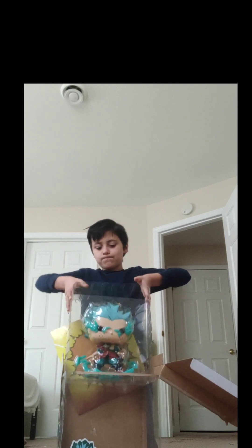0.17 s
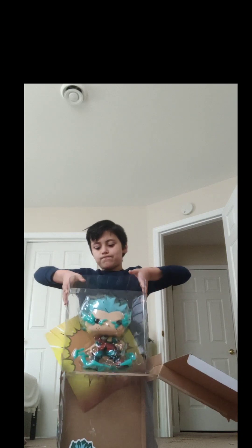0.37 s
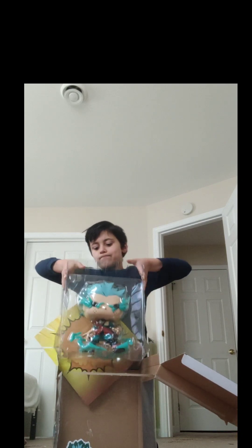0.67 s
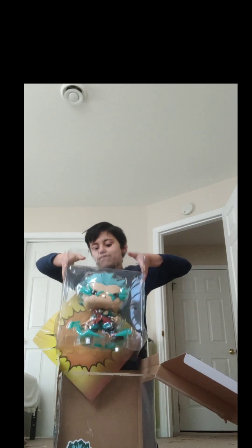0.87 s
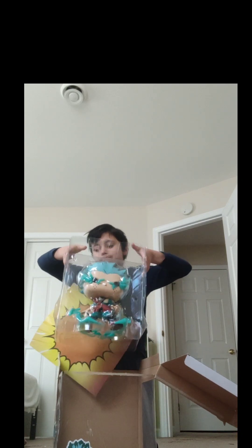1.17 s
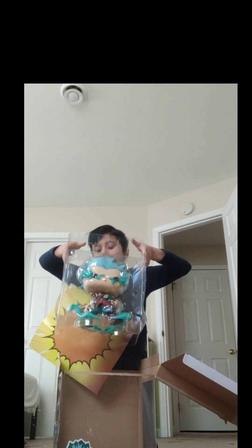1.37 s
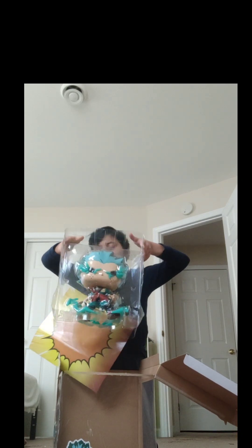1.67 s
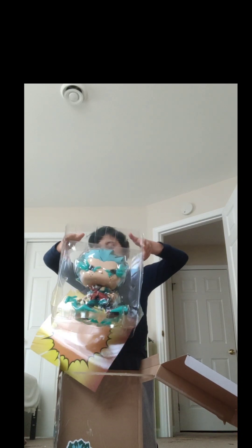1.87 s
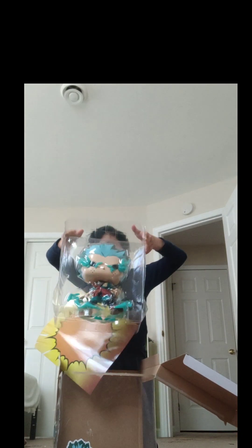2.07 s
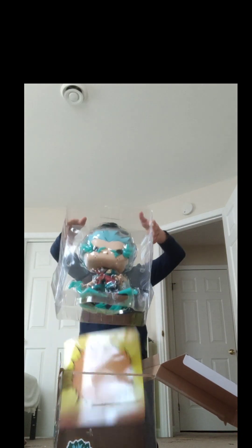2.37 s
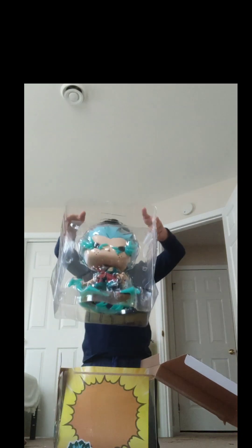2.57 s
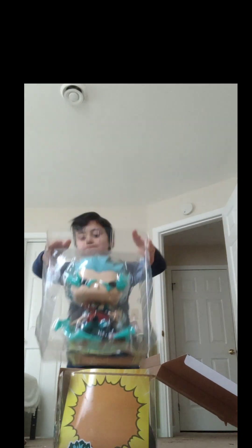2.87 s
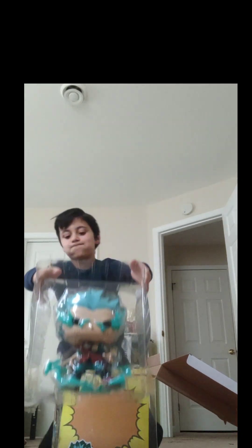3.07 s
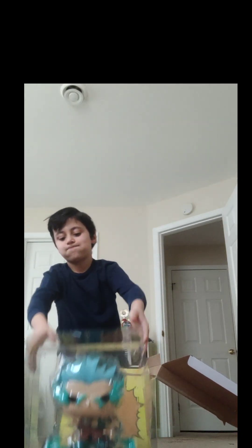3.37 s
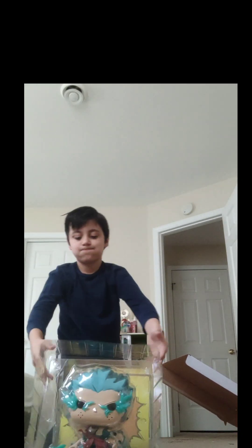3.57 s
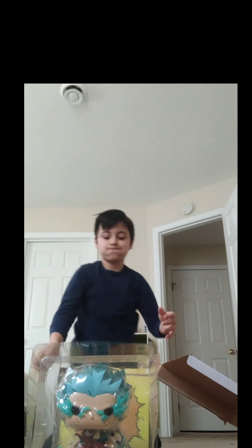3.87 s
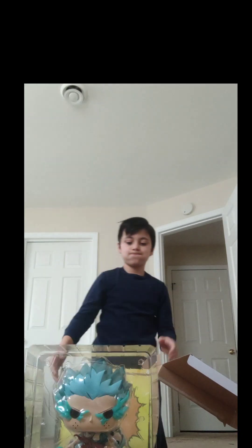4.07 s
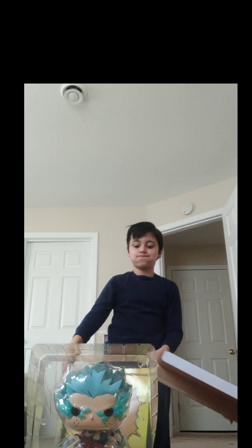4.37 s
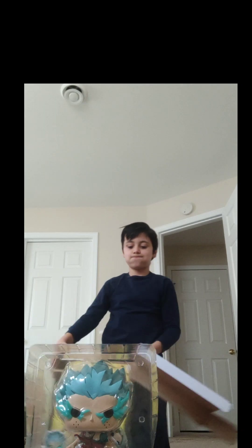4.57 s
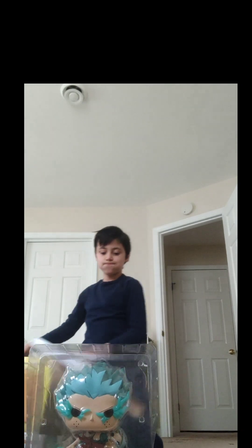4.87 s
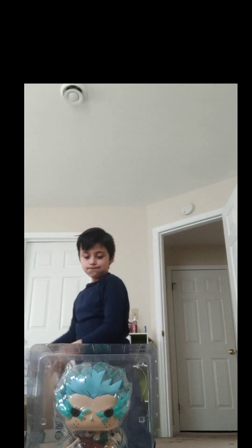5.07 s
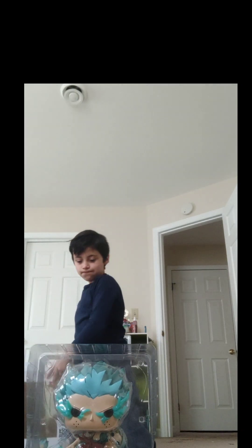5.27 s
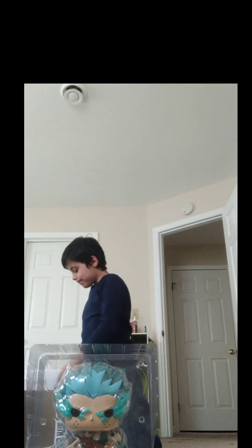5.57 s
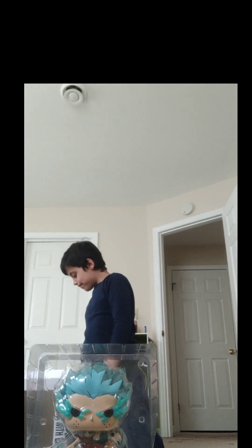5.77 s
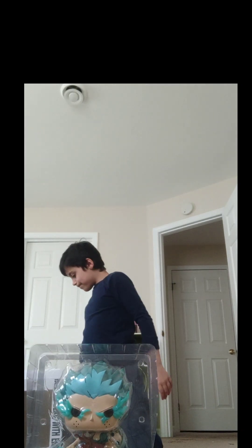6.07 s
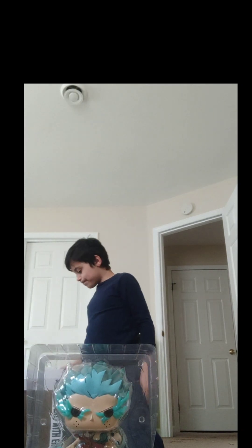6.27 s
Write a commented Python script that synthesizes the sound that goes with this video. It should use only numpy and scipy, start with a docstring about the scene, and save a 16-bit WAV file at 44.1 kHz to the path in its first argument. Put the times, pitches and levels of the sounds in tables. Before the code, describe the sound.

Toy packaging handled very near a stereo phone microphone indoors: dull cardboard rubs, thin plastic hiss and ticks, with quiet gaps. Midway a card insert knocks into the box, followed by a deep panel pop and the loudest moment, a thudding, crackling set-down. Afterwards the box is dragged about, with one more hollow pop, low puffs of air and fading scrapes.

```python
"""Toy tray out of a cardboard box

A big toy in a clear plastic tray is drawn out of a cardboard box in a small room, close to a phone.
The tray rubs in short strokes, sticks and snaps; a card insert slides out and drops back into the box;
the tray is set down with a clatter. Throughout, the box is shoved about: its cardboard scrapes and its
panels pop. Rubs, snaps and landings are shaped noise, card taps are decaying modes, panel pops are
swings of pressure."""
import sys
import numpy as np
from scipy import signal
from scipy.fft import rfft, irfft, next_fast_len
from scipy.io import wavfile

SR = 44100
rng = np.random.default_rng(int(sys.argv[2]) if len(sys.argv) > 2 else 0)


def dump_mix(stems):
    """Bounce the given channels to the path in sys.argv[1] as a 16-bit WAV at rate SR."""
    frames = np.atleast_2d(stems).T  # one column per channel
    limited = np.clip(frames, -1, 1)  # hard clip at full scale
    pcm = np.round(limited * 32767).astype(np.int16)
    wavfile.write(sys.argv[1], SR, pcm)


N = 282228
TIME = np.arange(N) / SR


def amp(db):
    """Decibels to gain."""
    return 10 ** (np.asarray(db) / 20)


def unit(x):
    """Scale to rms 1."""
    return x / np.sqrt(np.mean(x ** 2) + 1e-20)


def along(points, hz):
    """Read a curve of (Hz, value) points on a log frequency axis."""
    f, value = np.transpose(points)
    return np.interp(np.log(hz + 1), np.log(f), value)


def dull(hz, edge_hz, order):
    """Gain of a soft contact, which leaves out what lies above its edge."""
    return 1 / np.hypot(1, (hz / edge_hz) ** order)


def filtered(x, response):
    """Multiply the spectrum of x by a response of frequency."""
    n = x.shape[-1]
    size = next_fast_len(n + 4096)
    gain = response(np.fft.rfftfreq(size, 1 / SR))
    return irfft(rfft(x, size) * gain, size)[..., :n]


def coloured(x, spectrum, ripple_db=0, spacing_hz=110):
    """Give x a spectrum, at rms 1; the crowded modes of a sheet ripple it at random."""
    modes = rng.standard_normal(SR // 40)

    def gain(hz):
        ripple = ripple_db * np.interp(hz / spacing_hz, np.arange(len(modes)), modes)
        return amp(along(spectrum, hz) + ripple)

    return unit(filtered(x, gain))


def add(out, s, x):
    """Mix x into out from time s."""
    i = max(round(s * SR), 0)
    out[:, i:i + x.shape[-1]] += x[..., :max(N - i, 0)]


# How alike a noise is at the two ports. Each row: frequency in Hz, correlation from 0 to 1.
PORT_LIKENESS = [(130, .99), (300, .98), (430, .93), (680, .5), (1400, .15), (3000, 0)]


def half_turn(hz):
    """Angle in radians by which each port leans away from the common sound."""
    return np.arccos(np.clip(along(PORT_LIKENESS, hz), -1, 1)) / 2


def pair(n):
    """White noise at the two ports: alike in the bass, unrelated in the treble."""
    def share(hz):
        return np.array([np.cos(half_turn(hz)), np.sin(half_turn(hz))])

    mid, side = filtered(rng.standard_normal((2, n)), share)
    return np.array([mid + side, mid - side])


# How long the small room rings. Each row: frequency in Hz, 60 dB decay time in seconds.
ROOM_DECAY = [(100, 0.94), (260, 0.17), (700, 0.36), (2000, 0.19), (5000, 0.24), (13000, 0.33)]


def echo(x, gap=0.00089):
    """The room's answer: decaying noise, drawn anew each time, that swells in over about gap seconds."""
    hz, t, z = signal.stft(pair(SR // 2), SR, nperseg=256)
    decay = amp(-60 * t / along(ROOM_DECAY, hz)[:, None])
    tail = signal.istft(z * decay, SR, nperseg=256)[1]
    tail_s = np.arange(tail.shape[1]) / SR
    tail = tail * (1 - np.exp(-(tail_s / gap) ** 2))
    return signal.fftconvolve(np.atleast_2d(x), tail / np.linalg.norm(tail[0]), axes=1)


def in_room(x, wet_db):
    """A moving source: a new echo every quarter second, total power roughly unchanged."""
    out, step = x.copy(), SR // 4
    for i in range(0, N, step):
        add(out, i / SR, amp(wet_db) * echo(x[:, i:i + step]))
    return out / np.hypot(1, amp(wet_db))


def slips(rate, spread_db, life):
    """Envelope of rms 1: tiny stick-slip releases (rate per second, life in s), a few much larger."""
    happens = rng.random(N) < rate / SR
    size = amp(spread_db * np.minimum(rng.standard_exponential(N), 3.5))
    power = signal.lfilter([1], [1, -np.exp(-2 / (life * SR))], happens * size ** 2)
    return unit(np.sqrt(np.abs(power)))


SAG_DB_PER_S = 10  # every stroke loses speed while it lasts


def strokes(rows, rise_db_per_s, release_db_per_s):
    """Envelope of (s, length s, dB) strokes: each gathers speed, sags slowly and dies away."""
    t = TIME[::32]
    s, length, db = np.transpose(list(rows))[:, :, None]
    fade_db = np.maximum(rise_db_per_s * (s - t), SAG_DB_PER_S * (t - s))
    fade_db = fade_db + release_db_per_s * np.maximum(t - s - length, 0)
    return np.interp(TIME, t, np.linalg.norm(amp(db - fade_db), axis=0))


# Colours of the contact noises: the box's hollow body, its rough paper, the thin plastic.
# Each row: frequency in Hz, relative density in dB per Hz.
BODY_COLOUR = [(40, -20), (110, -13.5), (190, -2), (280, -2), (340, -1), (420, 1.5), (520, -5.5),
               (680, -5.5), (850, -20.5), (1300, -31), (3000, -71)]
RASP_COLOUR = [(350, -30), (700, 7), (1100, -3), (1900, 3), (2700, -1.5), (4000, -3), (6000, -17.5),
               (12000, -24.5)]
HISS_COLOUR = [(1500, -16.5), (3200, -8.5), (5000, -5), (6500, -0.5), (7600, -4.5), (9000, -5),
               (12000, -7.5), (15500, -6)]
SHEET_RIPPLE_DB = 2.5  # how unevenly the modes of a struck sheet answer


def contact(body, rasp, hiss, ripple_db=0):
    """Contact noise from three envelopes: the box's hollow body, its rough paper, the thin plastic."""
    n = len(body)
    hollow = body * coloured(pair(n), BODY_COLOUR)
    paper = rasp * coloured(pair(n), RASP_COLOUR, ripple_db)
    plastic = hiss * coloured(pair(n), HISS_COLOUR, ripple_db)
    return hollow + paper + plastic


# Colours of the moving air and of the quiet room. Each row: frequency in Hz, relative density in dB per Hz.
AIR_COLOUR = [(10, 0.5), (25, -7.5), (55, -15), (90, -13), (160, -36), (500, -58)]
QUIET_COLOUR = [(20, -6), (100, -11), (300, -17), (700, -24), (1500, -31), (4000, -26), (7000, -25),
                (10000, -40.5), (15500, -49.5)]
# Puffs of air pushed at the phone by the moving box. Each row: peak time in seconds, level in dB.
PUFFS = [(.3, -59), (2.93, -43), (3.21, -34), (3.5, -39), (4.05, -44), (4.4, -46), (5.48, -39), (5.9, -58)]
PUFF_RISE_DB_PER_S, PUFF_FALL_DB_PER_S, DRAUGHT_DB = 215.5, 107, -59


def background(quiet_db=-67):
    """Puffs of air from the moving box over a faint draught and the quiet of the room."""
    air = amp(DRAUGHT_DB)
    for s, db in PUFFS:
        fade_db = np.maximum(PUFF_RISE_DB_PER_S * (s - TIME), PUFF_FALL_DB_PER_S * (TIME - s))
        air = air + amp(db - fade_db)
    return air * coloured(pair(N), AIR_COLOUR) + amp(quiet_db) * coloured(pair(N), QUIET_COLOUR)


# The stiff card insert strikes the box. Each row: start in seconds, level in dB, brightness edge in Hz.
TAPS = [(1.997, -40, 520), (2.201, -45, 1200), (2.423, -48.5, 647), (2.478, -40.5, 458),
        (2.5368, -21.5, 720), (2.554, -18, 1500), (2.561, -11.5, 2460), (2.582, -20.5, 1200),
        (2.614, -15, 371), (2.633, -20, 362), (3.47, -28, 590), (3.492, -22, 1340), (5.905, -45, 1500),
        (5.925, -43, 1400)]
# The card's modes. Each row: frequency in Hz, level in dB before scatter, 60 dB decay time in seconds.
CARD_MODES = [(375, -4, 0.11), (417, -4.5, 0.21), (459, 0.5, 0.052), (622, -2, 0.11), (699, 3.5, 0.13),
              (752, -8, 0.1), (813, -9, 0.11), (977, -6, 0.097), (1074, -14, 0.1005), (1118, -13, 0.14),
              (1330, -13, 0.075), (1441, -9, 0.13), (1640, -12.5, 0.097), (1924, -10, 0.1), (2006, -9, .08)]


def tapping(flutter=0.97, scatter_db=2.0):
    """The card rings briefly at each blow; loose in the box, it holds no steady pitch."""
    out, t = np.zeros((2, N)), np.arange(SR // 4) / SR
    hz, mode_db, t60 = np.transpose(CARD_MODES)[:, :, None]
    # higher modes reach the two ports more out of step
    skew = np.array([1, -1])[:, None, None] * half_turn(hz)
    attack = 1 - np.exp(-t / 0.0016)
    for s, db, bright_hz in TAPS:
        # phase wanders by flutter radians (rms) in 27 ms
        steps = rng.standard_normal((len(CARD_MODES), len(t)))
        drift = flutter * np.cumsum(steps, axis=1) / np.sqrt(0.027 * SR)
        size = amp(db + mode_db + scatter_db * rng.standard_normal(hz.shape))
        size = size * dull(hz, bright_hz, order=3)
        phase = 2 * np.pi * (hz * t + rng.random(hz.shape)) + drift
        phase = phase + skew * rng.choice([-1, 1], hz.shape)
        ringing = size * amp(-60 * t / t60) * np.sin(phase)
        add(out, s, ringing.sum(1) * attack)
    return in_room(out, wet_db=-9.5)


# Heavy landings. Each row: start in seconds, rise in seconds, time in seconds from start to fade,
# 60 dB decay time of the body in seconds, body level in dB, rasp level in dB, hiss level in dB.
LANDINGS = [(2.5463, 0.0021, 0.019, 0.47, -25, -24.5, -28), (3.481, 0.0038, 0.086, 0.54, -22, -32.5, -23.5)]


def landing():
    """Card and tray come down and chatter to rest; the treble dies first."""
    body, rasp, hiss = np.zeros((3, N))
    for s, rise, length, t60, body_db, rasp_db, hiss_db in LANDINGS:
        swell = np.clip((TIME - s) / rise, 0, 1)
        fade_db = -60 * np.maximum(TIME - s - length, 0) / t60
        body += swell * amp(body_db + fade_db)
        rasp += swell * amp(rasp_db + 2.6 * fade_db)
        hiss += swell * amp(hiss_db + 3.3 * fade_db)
    chatter = slips(rate=900, spread_db=3, life=.0025)
    clatter = contact(body * chatter, rasp * chatter, hiss * chatter, ripple_db=SHEET_RIPPLE_DB)
    return in_room(clatter, wet_db=-1.5)


# Cardboard scrapes, one per shove. Each row: start of full speed in seconds, length in seconds,
# box body level in dB, rasp in dB relative to it, boom of the large panels in dB relative to it.
SCRAPES = [(0, 0.0091, -34.5, -9, 4), (0.087, 0.096, -45.5, -8, 2.5), (0.268, 0.032, -40, -9, -0.5),
           (0.408, 0.014, -44, -3.5, 2), (0.536, 0.018, -54, -2.5, 0), (0.613, 0.049, -60, -18, 5),
           (0.773, 0.032, -52, -6.5, -3), (0.893, 0.024, -46, -6.5, -4), (1, 0.047, -43.5, -16, 0),
           (1.096, 0.011, -64.5, 12, 15.5), (1.302, 0.027, -48.5, -11, -14),
           (1.424, 0.16, -42.5, -11.5, -14), (1.619, 0.15, -43.5, -10.5, -6.5), (2.003, 0.033, -51, -8, -2),
           (2.092, 0.14, -51, 2, 3), (2.393, 0.027, -57, -3.5, -2), (2.484, 0.035, -43, -13, 6),
           (2.72, 0.11, -49, -10, -3), (2.894, 0.066, -44, -11, -9), (3.234, 0.066, -46, -13.5, -0.5),
           (3.403, 0.076, -36.5, -18, -4), (3.679, 0.18, -36, -13.5, 1.5), (3.946, 0.043, -40, -14.5, 4),
           (4.091, 0.15, -46.5, -16.5, 5.5), (4.264, 0.05, -45.5, -10, 0), (4.405, 0.077, -44, -26, 3),
           (4.575, 0.018, -31.5, -27, 3), (4.647, 0.02, -39.5, -18, 8.5), (4.76, 0.035, -41.5, -11, 4.5),
           (5.025, 0.11, -50, -9, 3.5), (5.356, 0.088, -51.5, -18, 3), (5.479, 0.095, -33, -13.5, -5.5),
           (5.683, 0.022, -39.5, -14.5, -2.5), (5.91, 0.0093, -37, -20.5, 2.5),
           (6.309, 0.033, -50.5, -24, 9)]
SCRAPE_RISE_DB_PER_S, SCRAPE_RELEASE_DB_PER_S = 797, 157.5
# The plastic tray slides and hisses. Each row: start of full speed in seconds, length in seconds, level in dB.
SLIDES = [(.005, 0.014, -42), (.1, 0.17, -56.5), (.22, 0.14, -49), (.41, 0.01, -39.5), (.54, 0.17, -56),
          (.79, 0.025, -60.5), (.888, 0.019, -42.5), (.98, 0.019, -63), (1.125, 0.0067, -54.5),
          (1.38, 0.14, -60), (1.655, 0.03, -54), (2.095, 0.073, -44.5), (2.18, 0.021, -45),
          (2.39, 0.059, -56.5), (2.71, 0.086, -59.5), (2.89, 0.061, -53), (3.11, 0.044, -65.5),
          (3.7, 0.057, -39.5), (3.96, 0.11, -54.5), (4.14, 0.24, -53.5), (4.28, 0.022, -49),
          (4.39, 0.096, -53.5), (4.58, .03, -56.5), (4.765, 0.012, -47), (5.05, 0.11, -56.5),
          (5.35, 0.15, -57), (5.495, 0.078, -48), (5.65, .08, -52), (5.92, 0.1, -56), (6.29, 0.14, -54.5)]
SLIDE_RISE_DB_PER_S, SLIDE_RELEASE_DB_PER_S = 349, 147
# the hands never hold the box quite still: faint rubbing between shoves
GRIP_BODY_DB, GRIP_RASP_DB = -62.5, -74.5


def rubbing(boom_hz=290):
    """Cardboard drags in coarse slips, plastic in fine ones."""
    s, length, db, rasp_db, boom_db = np.transpose(SCRAPES)

    def scrape(level_db, grip_db):
        shoves = strokes(zip(s, length, level_db), SCRAPE_RISE_DB_PER_S, SCRAPE_RELEASE_DB_PER_S)
        return np.hypot(amp(grip_db), shoves)

    body = scrape(db, GRIP_BODY_DB)
    rasp = scrape(db + rasp_db, GRIP_RASP_DB)
    boom = scrape(db + boom_db, GRIP_BODY_DB)
    hiss = strokes(SLIDES, SLIDE_RISE_DB_PER_S, SLIDE_RELEASE_DB_PER_S)
    coarse = slips(rate=750, spread_db=2.6, life=.004)
    fine = slips(rate=1100, spread_db=2.8, life=.0025)
    rub = contact(body * coarse, rasp * coarse, hiss * fine, ripple_db=5.5)
    # the large panels raise or lower the bass of each shove
    bass = filtered(rub, lambda hz: dull(hz, boom_hz, order=5))
    return in_room(rub + (boom / body - 1) * bass, wet_db=-4.5)


# Cardboard panels pop or are bumped. Each row: time of the swing's peak in seconds, peak of the swing in dB,
# brightness edge in Hz, room echo in dB relative to the swing.
POPS = [(1.588, -27.5, 704, -6), (2.8702, -6, 1140, -12), (2.996, -28.5, 700, -6), (3.16, -21, 230, -3.5),
        (3.4929, -11, 900, -19), (3.4989, -4.5, 667, -16), (3.513, -8.5, 900, -10),
        (3.576, -11.5, 492, -17), (3.604, -25, 700, -7.5), (3.618, -18.5, 700, -15),
        (4.018, -23.5, 700, -7), (4.119, -27.5, 277, -5), (4.181, -26.5, 300, -13),
        (4.893, -7.5, 930, -11.5), (5.465, -30.5, 130, -6)]
# What a flexing panel radiates. Each row: frequency in Hz, relative level in dB.
PANEL_COLOUR = [(30, -29), (70, -19), (130, -11), (190, 1), (290, 3.5), (370, -11), (490, -0.5),
                (680, -8.5), (820, -50), (1050, -14), (1600, -63), (3000, -36)]


def popping(crease_t60=0.1, crease_db=-22, crease_brighter=1.19, ceiling_s=0.036, ceiling_db=-17):
    """A panel creases and flips through rest: one short swing of pressure, duller for a softer bump."""
    out, size = np.zeros((2, N)), 4096
    hz, t = np.fft.rfftfreq(size, 1 / SR), np.arange(size) / SR
    for s, db, bright_hz, room_db in POPS:
        spectrum = amp(along(PANEL_COLOUR, hz)) * dull(hz, bright_hz, order=4)
        swing = np.roll(irfft(spectrum), size // 2)
        swing = amp(db) * swing / swing.max()
        start = s - size / 2 / SR
        add(out, start, swing)
        add(out, start + ceiling_s, amp(ceiling_db) * swing)
        add(out, start + 0.00832, amp(room_db) * echo(swing))
        # the paper starts to give a moment before the panel flips
        crease = amp(db + crease_db - 60 * t / crease_t60) * coloured(pair(size), RASP_COLOUR)
        crease = filtered(crease, lambda hz: dull(hz, crease_brighter * bright_hz, order=3))
        add(out, s - .0035, crease)
        add(out, s, amp(-7.0) * echo(crease))
    return out


# The plastic tray snaps and ticks. Each row: start in seconds, crack level in dB,
# depth (mid-range relative to the treble) in dB, treble edge in Hz.
SNAPS = [(0.2815, -29, -2.5, 10700), (0.4276, -33, 0.5, 14000), (0.6168, -33, 2.5, 8500),
         (0.8663, -38.5, -11, 9900), (0.9685, -28, -2, 9300), (1.3573, -32.5, -4, 9500),
         (1.5812, -45, 5.5, 8000), (1.6425, -30, -4.5, 14940), (2.5185, -30, -4, 12100),
         (2.6756, -28, -1, 14900), (2.934, -38, 1, 11000), (2.9932, -42, 4, 8000),
         (3.09, -42.5, -1.5, 11000), (3.149, -48, 3.5, 6000), (3.2334, -46.5, 3, 11000),
         (3.3686, -42, 0, 8000), (3.4044, -27, -12.5, 7000), (3.457, -30.5, 0, 8000),
         (3.4854, -22, -16.5, 12000), (3.494, -20.5, -27.5, 12000), (3.539, -18, -5, 10000),
         (3.5486, -18.5, -30, 9500), (3.571, -15.5, -22.5, 9180), (3.6978, -37.5, 1.5, 13000),
         (3.72, -40, -7, 9100), (3.756, -28.5, -34.5, 14000), (3.834, -42, 5.5, 9000),
         (3.9262, -38.5, 0, 14000), (3.9523, -23, -18.5, 7000), (4.0365, -31, -7.5, 13000),
         (4.5638, -34, -0.5, 10940), (4.6507, -44.5, 4.5, 8000), (4.756, -38, -5.5, 11000),
         (4.936, -42.5, -3, 10000), (5.505, -42, 0, 9000)]
# a deeper snap comes from a larger piece of wall: it lasts longer and shakes the box more
CRACK_T60_S = 0.04  # at depth 0 dB
CRACK_DOUBLING_DB = 13  # extra depth that doubles the decay time
SNAP_BODY_DB = 4  # box body relative to the mid-range


def snapping(shiver_t60=0.22, shiver_db=-17, body_t60=0.097, wet_db=-2):
    """The tray buckles with a crack, then its walls shiver and shake the box."""
    out, t = np.zeros((2, N)), np.arange(SR // 6) / SR
    knock = amp(-60 * t / body_t60) * (1 - np.exp(-t / 0.0036))
    click = .8 * amp(-60 * t / .006)
    shiver = amp(shiver_db - 60 * t / shiver_t60)
    for s, db, depth_db, edge_hz in SNAPS:
        crack_t60 = CRACK_T60_S * 2 ** (depth_db / CRACK_DOUBLING_DB)
        crack = click + amp(-60 * t / crack_t60) + shiver
        body = amp(SNAP_BODY_DB + depth_db) * knock
        snap = contact(body, amp(depth_db) * crack, crack, ripple_db=SHEET_RIPPLE_DB)
        snap = amp(db) / crack.max() * filtered(snap, lambda hz: dull(hz, edge_hz, order=4))
        add(out, s, snap)
        add(out, s + .003, amp(wet_db) * echo(snap))
    return out


def scene():
    """All the handling noises together over the background."""
    return background() + tapping() + landing() + rubbing() + popping() + snapping()


# The phone's two microphone ports. Each row: frequency in Hz, gain in dB.
LEFT_PORT = [(100, 2.5), (700, -3), (1300, -0.5), (4000, -1.5), (5700, 1), (6300, -5), (7100, -16.5),
             (9000, -15.5), (15000, -22.5)]
RIGHT_PORT = [(100, 1), (700, -4.5), (1200, 3), (4000, 0.5), (5600, 3), (6900, 10), (7500, 9.5),
              (8200, -1.5), (10000, -6.5), (15000, -17.5)]
TOP_HZ = 15550  # band limit


def record(dry):
    """Each port colours the sound its own way, the preamplifiers hiss, nothing passes the band limit."""
    ports = filtered(dry, lambda hz: amp([along(LEFT_PORT, hz), along(RIGHT_PORT, hz)]))
    hiss = amp(-72) * rng.standard_normal((2, N))
    return filtered(ports + hiss, lambda hz: hz < TOP_HZ)


dry = scene()
out = record(dry)
dump_mix(out)
```